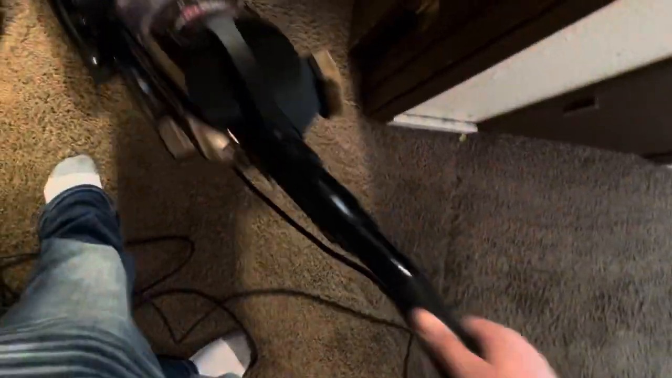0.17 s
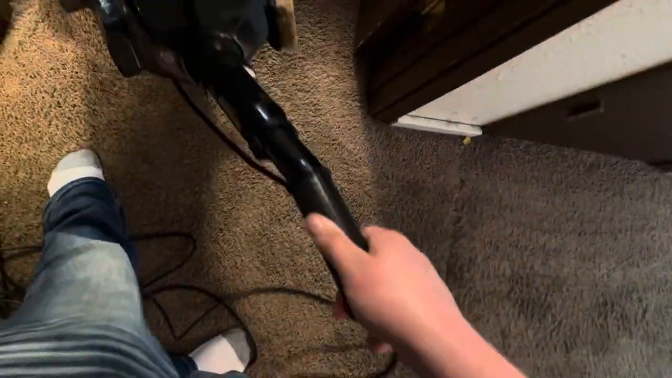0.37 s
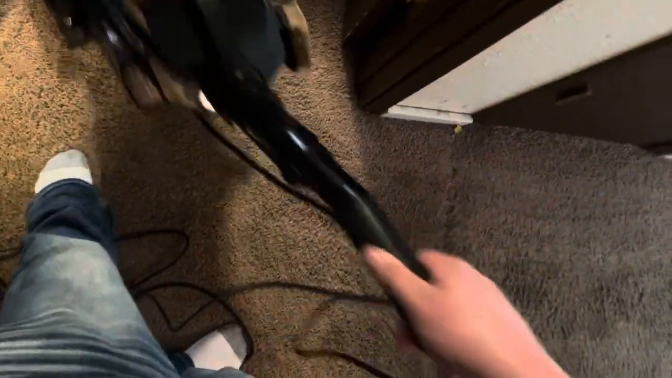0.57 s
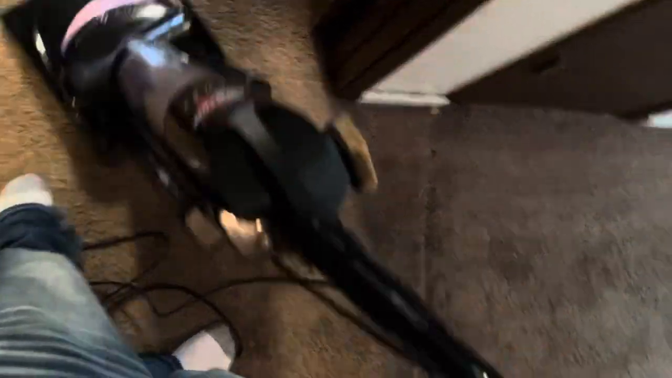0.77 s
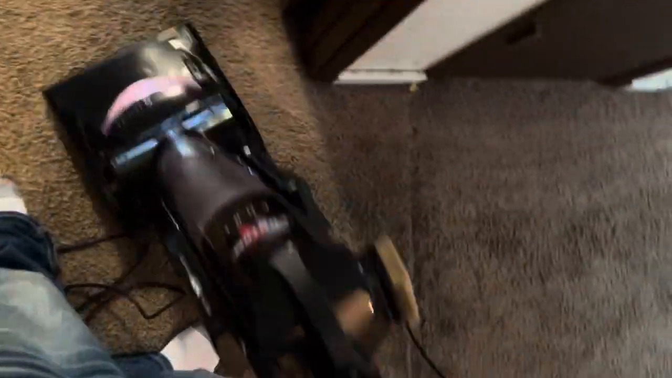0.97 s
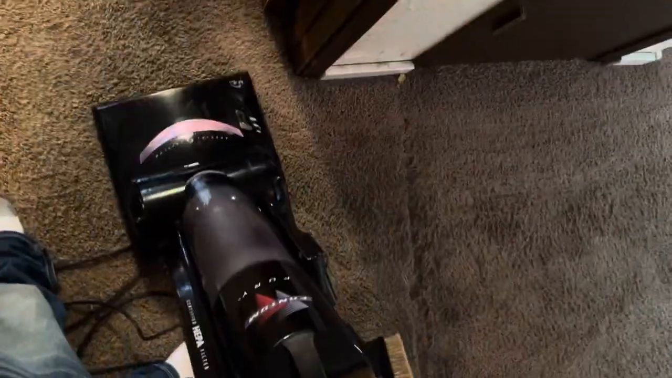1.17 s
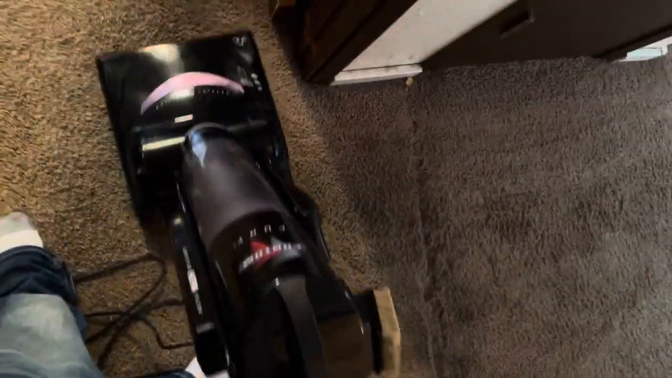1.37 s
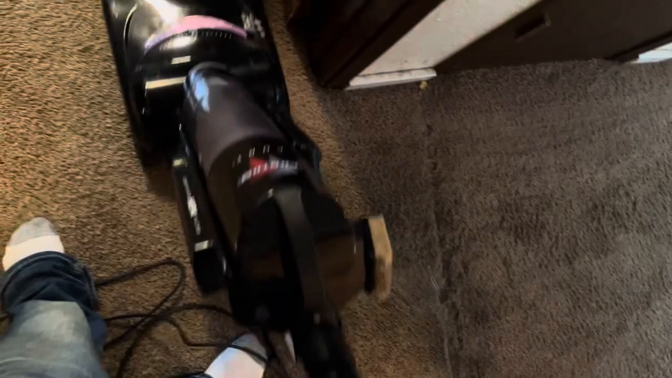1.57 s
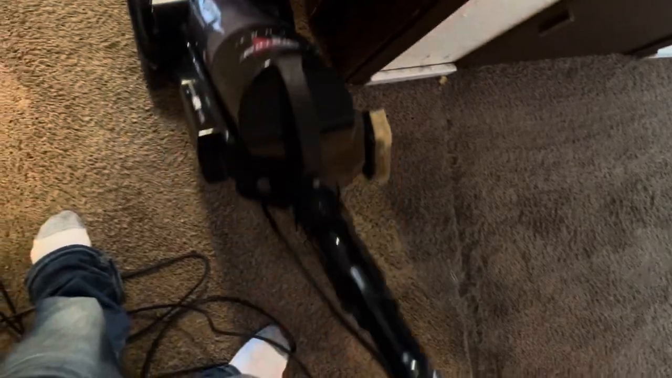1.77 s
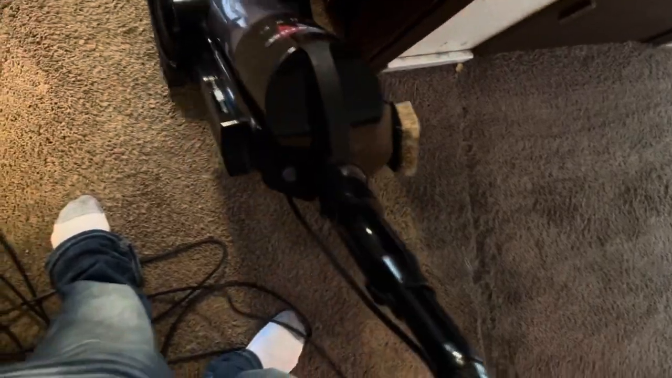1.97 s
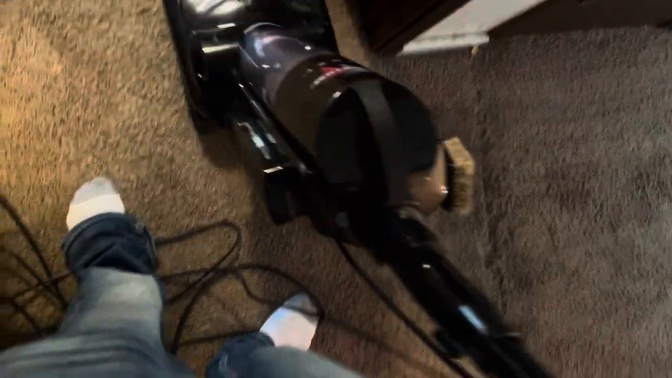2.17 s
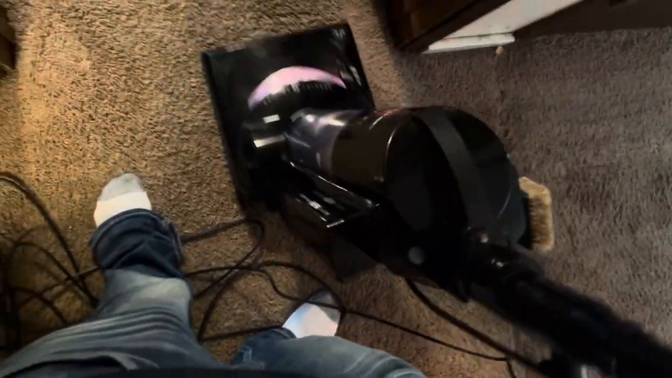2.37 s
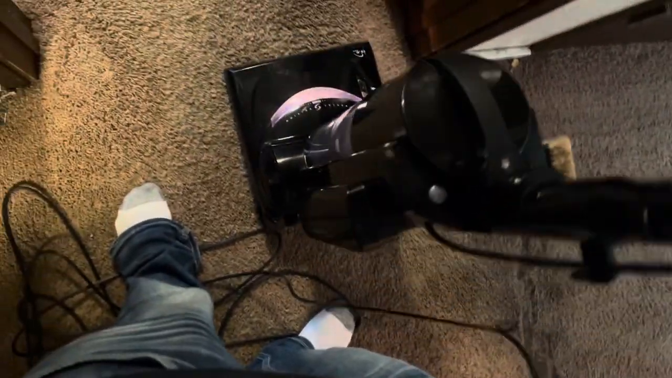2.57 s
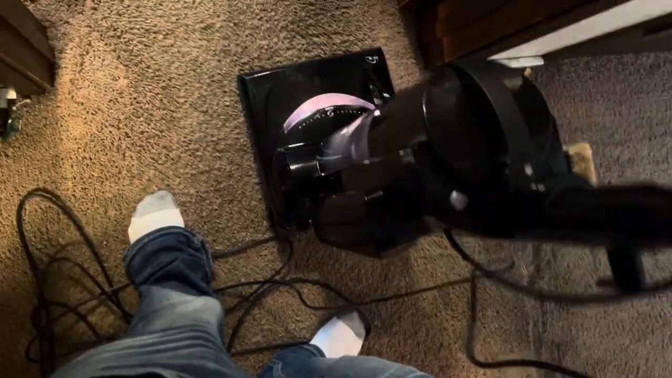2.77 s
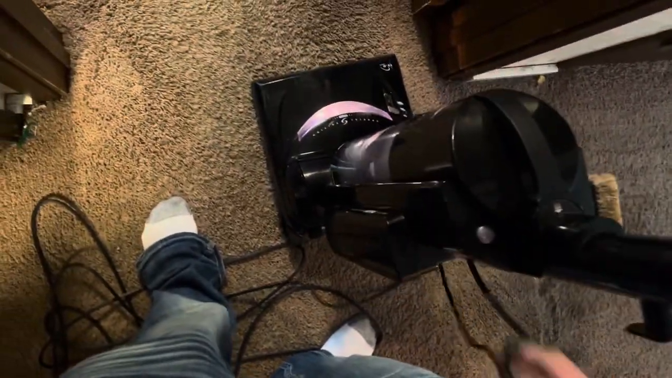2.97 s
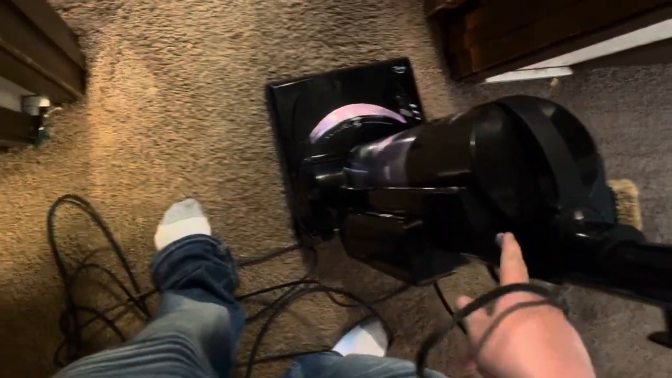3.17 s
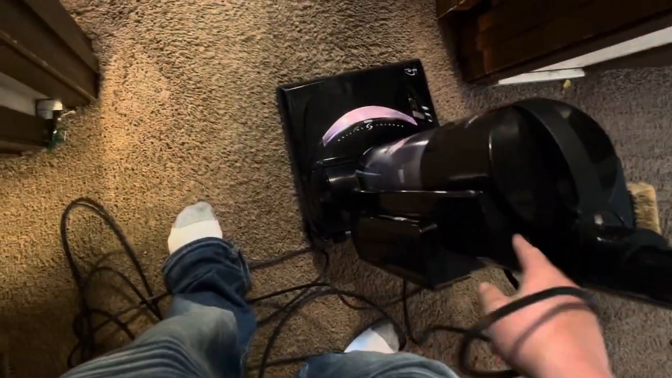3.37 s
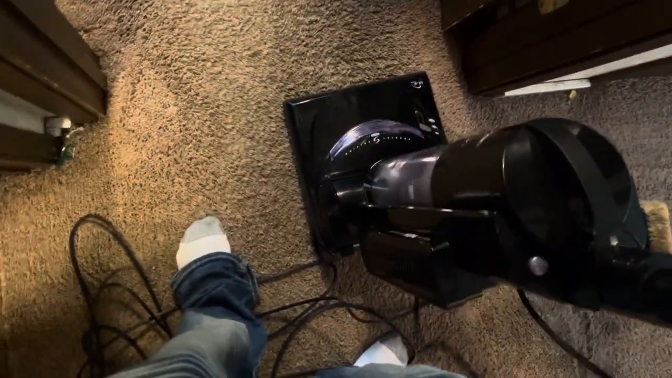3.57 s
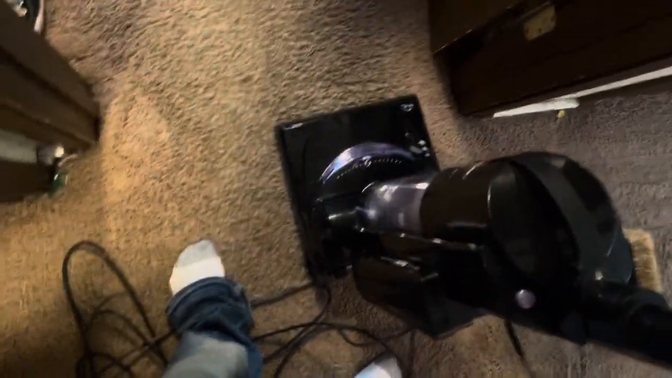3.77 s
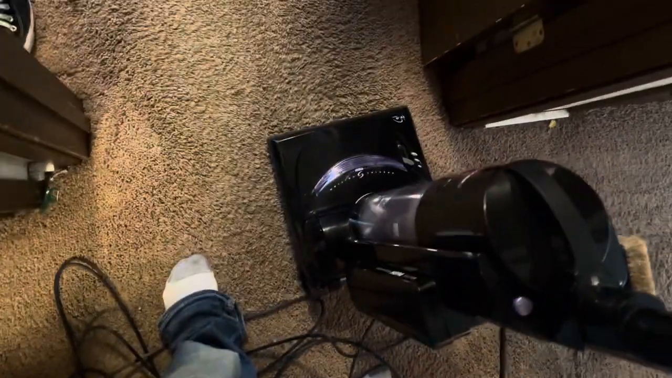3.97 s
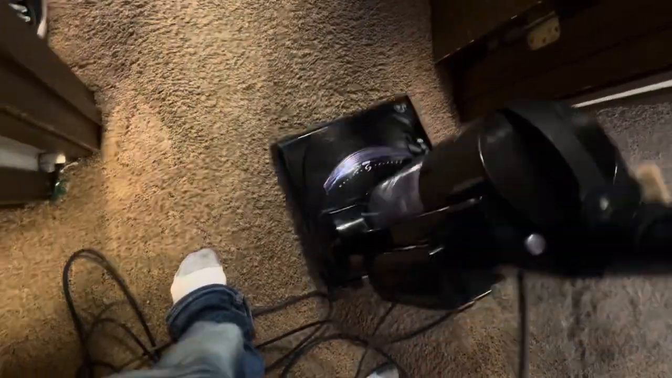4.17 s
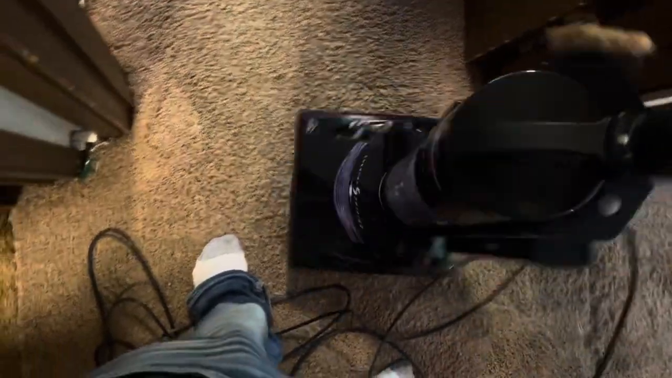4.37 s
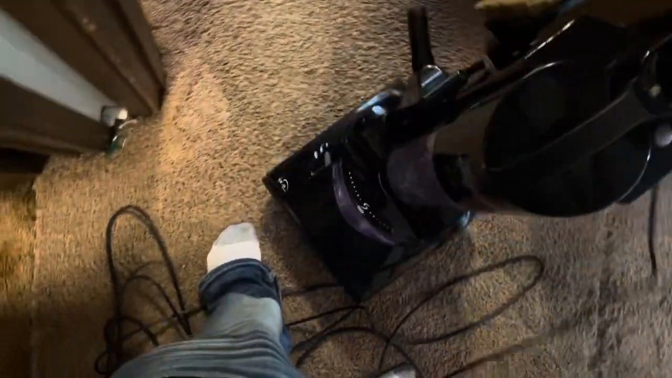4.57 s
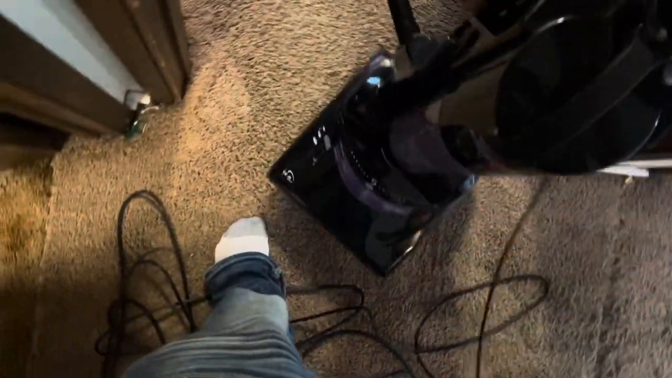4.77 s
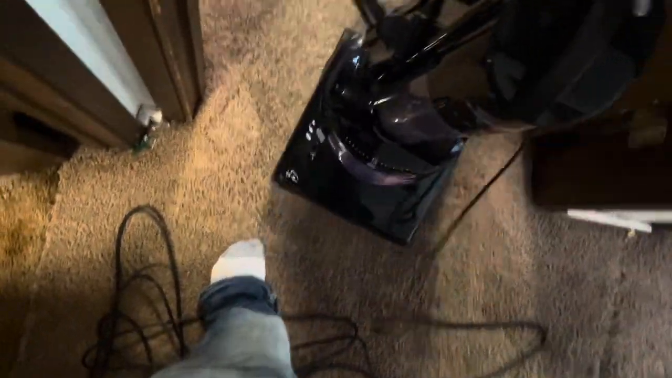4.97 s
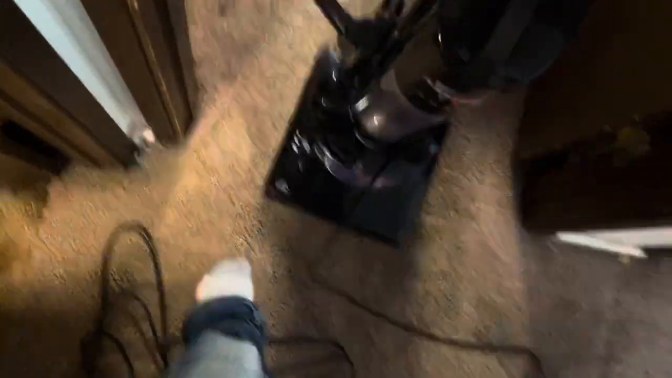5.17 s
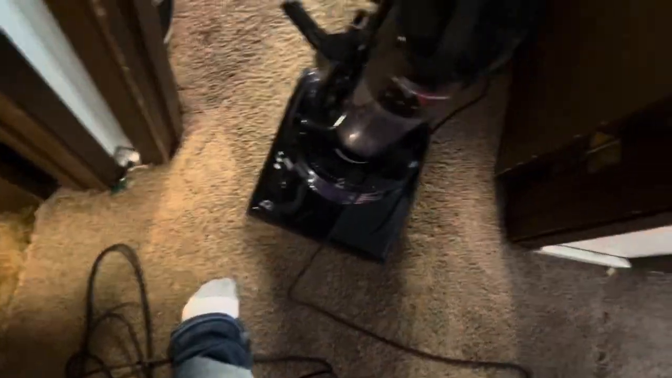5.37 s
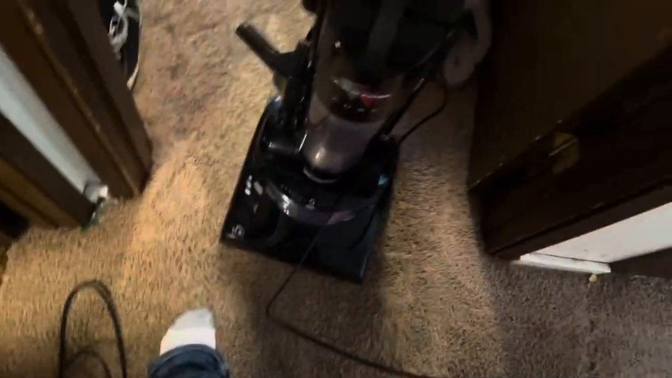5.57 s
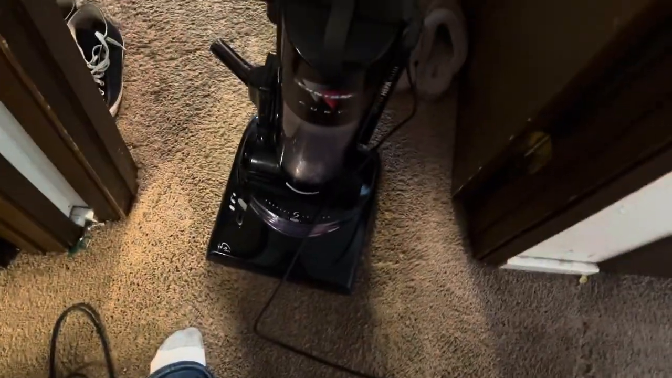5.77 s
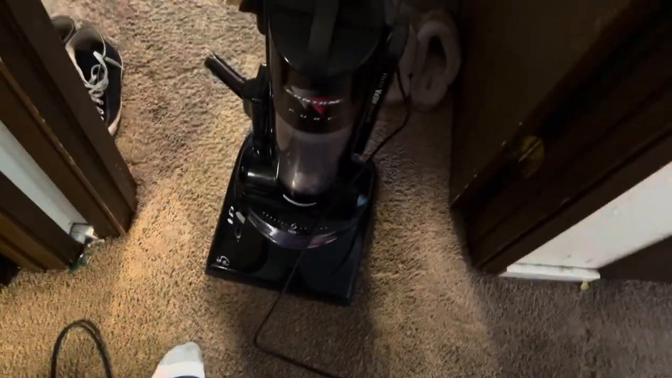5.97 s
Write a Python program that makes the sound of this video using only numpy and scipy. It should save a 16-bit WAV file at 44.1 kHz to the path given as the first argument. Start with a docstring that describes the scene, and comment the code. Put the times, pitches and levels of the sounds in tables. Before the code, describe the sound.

Close indoor vacuum cleaner roar with steady motor whine and brush hum, a latch clunk, switch click, falling coast-down and a rattling plastic thump.

```python
"""Vacuum cleaner on carpet, switched off and set aside

An upright vacuum cleaner is pushed over carpet in a small room, latched upright and switched off.
Whine and brush hum are sums of rotation-locked sines; the rushing air is noise shaped by duct resonances.
Tied by a belt, motor and brush roll coast down together. The machine is tipped back, wheeled aside
and set down; its plastic body clunks, snaps and rattles as decaying modes and noise bursts.
"""
import sys
import numpy as np
from scipy import signal
from scipy.fft import rfft, irfft
from scipy.io import wavfile
from scipy.ndimage import uniform_filter1d

SR = 44100
rng = np.random.default_rng(int(sys.argv[2]) if len(sys.argv) > 2 else 0)


def to_wav(sig):
    """Store sig (one row per channel, or 1-D mono) as 16-bit WAV at the path in sys.argv[1].

    Samples outside -1..1 are clipped; the rate is SR.
    """
    pcm = np.clip(np.atleast_2d(sig), -1, 1) * 32767
    pcm = np.round(pcm).astype(np.int16)
    wavfile.write(sys.argv[1], SR, pcm.T)  # frames by channels


N = 265570
TIME = np.arange(N) / SR

SWITCH_OFF_S = 3.4
# handle raised upright
RAISE_MIDDLE_S, RAISE_TAKES_S = 2.34, .65
# tipped back on the wheels, brush clear of the carpet, then set down
TIP_S, SET_DOWN_S, TIP_TAKES_S = 4.18, 5.09, .14

# motor speed under power: time_s, turns_per_s
RUNNING = [(0, 457), (.6, 460.7), (1.2, 456), (2.4, 458.5), (3.05, 465), (3.38, 463)]
# push out over the carpet: time_s, reach (0 near - 1 far)
REACH = [(0, 0.43), (.4, 1), (.6, 1), (.8, 0.21), (1.45, 0.02), (1.8, 0.68), (2.2, 0.1)]
# low resonances the slowing tones glide through: centre_hz, width_hz, lift_db
HOUSING = [(248, 26, 10), (292, 30, 10)]


def gain_of(db):
    """Decibels to amplitude."""
    return 10 ** (np.asarray(db) / 20)


def evened(x):
    """Scales to rms 1."""
    return x / np.sqrt(np.mean(x ** 2) + 1e-20)


def read(points, hz):
    """Spectrum table interpolated on a log-frequency axis."""
    f, value = np.transpose(points)
    return np.interp(np.log(hz + 1), np.log(f + 1), value)


def follow(rows, t):
    """Each column of a curve table at the times t."""
    s, *columns = np.transpose(rows)
    return np.array([np.interp(t, s, c) for c in columns])


def ramp(t, middle_s, takes_s):
    """A movement from 0 to 1."""
    return np.clip(.5 + (t - middle_s) / takes_s, 0, 1)


def swell(t, middle_s, half_s):
    """A movement from 0 to 1 and back."""
    return np.exp(-((t - middle_s) / half_s) ** 2)


def wander(hz, size=4096):
    """Slow random curve of rms 1, with little above the given rate."""
    t = np.linspace(0, N / SR, size)
    lowpass = 1 + (np.fft.rfftfreq(size, t[1]) / hz) ** 2
    slow = irfft(rfft(rng.standard_normal(size)) / lowpass)
    return evened(np.interp(TIME, t, slow))


def coloured(x, spectrum):
    """Filters x by a spectrum table."""
    return irfft(rfft(x) * gain_of(read(spectrum, np.fft.rfftfreq(len(x), 1 / SR))), len(x))


def add(mix, s, sound):
    """Mixes a sound in at time s."""
    part = mix[round(s * SR):][:len(sound)]
    part += sound[:len(part)]


def lift_db(resonances, hz):
    """Summed lift that a set of resonances gives at hz."""
    return sum(lift / (1 + (2 * (hz - f) / width) ** 2) for f, width, lift in resonances)


def stereo_spread(hz):
    """Complex gain of the left and right channel at each frequency: the stereo spread."""
    # centre_hz, left_lead_rad
    spread_phase = [(50, 0), (520, .1), (860, 1.4), (1300, .15), (1800, .15), (3000, 1.2), (4000, .4),
                    (5150, .5), (5700, -1.3), (6500, -1.2), (7600, -2.9), (9400, -3.2), (10500, -4.3),
                    (12000, -5.6), (12500, -6.2)]
    # centre_hz, left_minus_right_db
    spread_balance = [(60, 2.5), (120, 3), (200, 1.2), (290, .3), (360, -2.3), (460, 0), (700, 2.7),
                      (1300, 6.8), (2400, 4), (4400, 3.3), (8100, .3), (15000, 0)]
    half = gain_of(read(spread_balance, hz) / 2) * np.exp(.5j * read(spread_phase, hz))
    return np.array([half, 1 / half])


def tipped(t):
    """1 while the machine leans back on its wheels."""
    return ramp(t, TIP_S, TIP_TAKES_S) - ramp(t, SET_DOWN_S, TIP_TAKES_S)


def motor_hz(t):
    """Nearly steady under power; then fan (speed squared), bearings and carpet brake the motor."""
    fan_share_per_turn, bearing_hz_per_s, carpet_hz_per_s = .0013, 13.5, 20.5
    # set down again, the brush bites: lasting drag, and an extra at the landing
    landed_hz_per_s, landing_hz_per_s, landing_half_s = 29.5, 17.5, .08
    step_s = .005
    speed, hz = list(RUNNING), RUNNING[-1][1]
    times = np.arange(SWITCH_OFF_S, N / SR, step_s)
    brush_drag = carpet_hz_per_s * (1 - ramp(times, TIP_S, TIP_TAKES_S))
    brush_drag += landed_hz_per_s * ramp(times, SET_DOWN_S, TIP_TAKES_S)
    brush_drag += landing_hz_per_s * swell(times, SET_DOWN_S, landing_half_s)
    for s, drag in zip(times, brush_drag):
        speed.append((s, hz))
        hz = hz - step_s * (fan_share_per_turn * hz ** 2 + bearing_hz_per_s + drag)
    return follow(speed, t)[0]


def halvings(t):
    """How many times the motor's speed has halved."""
    return np.log2(RUNNING[-1][1] / motor_hz(t))


def coasting_db(step_db, per_halving_db, step_s):
    """A tone's level steps as the power goes; it also follows the speed."""
    return step_db * np.clip((TIME - SWITCH_OFF_S) / step_s, 0, 1) + per_halving_db * halvings(TIME)


def partial(turns, hz, db, scatter, scatter_hz, place=1):
    """One line: a steady direct part plus reflections that shift as the machine moves."""
    reflections = scatter * (wander(scatter_hz) + 1j * wander(scatter_hz))
    path = (1 + reflections) / np.sqrt(1 + 2 * scatter ** 2)
    tone = np.sqrt(2) * gain_of(db) * path * np.exp(2j * np.pi * (turns + rng.random()))
    return (place * stereo_spread(hz) * tone).real


def overtones(turns, hz, orders, scatter, scatter_hz):
    """Multiples of a rotation; levels follow motor speed and swell in the shaken housing panels."""
    # motor speeds at which the overtone levels are given: turns_per_s
    stages_hz = [460, 350, 265, 232, 160]
    # housing panels: centre_hz, width_hz, lift_db
    panels = [(690, 130, 9), (1370, 140, 7), (3650, 250, 3), (5050, 700, 9)]
    slowed, out = halvings(TIME), 0
    stage_halvings = np.log2(stages_hz[0] / np.array(stages_hz))
    for k, *stages_db in orders:
        db = np.interp(slowed, stage_halvings, stages_db) + lift_db(panels, k * hz)
        out = out + partial(k * turns, k * hz, db, scatter, scatter_hz)
    return out


def motor(mains_hz=120, mains_db=-47, far_db=-8.5):
    """Unbalanced fan sounds once a turn; blades and commutator add high lines; powered windings hum."""
    # tone before coasting, housing and vent: time_s, level_db
    whine_level = [(0.0, -24.5), (0.18, -20.5), (0.52, -22), (0.86, -20), (1.18, -26), (1.42, -20),
                   (1.89, -26), (1.92, -31.5), (2.17, -22), (2.65, -23.5), (2.79, -31.5), (2.81, -24.5),
                   (3.42, -23.5)]
    # where the whine is heard as the body turns: time_s, left_minus_right_db, left_lead_rad
    whine_place = [(0, 1.7, 0.21), (.6, .6, 0.24), (1.3, -.7, 0.33), (1.7, 2.2, .19), (2, 2.4, 0.24),
                   (2.3, -1, -0.25), (2.75, -3.5, -0.23), (3, -5, -0.71), (3.35, -6, -0.97),
                   (3.6, 6, -0.036)]
    # overtones before panel lift; commutator near 22: multiple, level_db at each of the five stages
    motor_orders = [(2, -57, -58, -42, -49, -51), (3, -43, -55, -61, -51, -59),
                    (4, -60, -54, -57, -62, -68), (5, -65, -60, -55, -59, -68),
                    (6, -68, -65, -61, -56, -67), (7, -70, -68, -67, -64, -67),
                    (8, -51, -64, -63, -69, -71), (9, -67, -67, -72, -72, -68),
                    (11, -62.5, -56, -68, -71, -73), (13, -66, -64, -61, -70, -76),
                    (16, -72, -69, -75, -73, -78), (20, -85, -85, -80, -80, -74),
                    (21, -85, -85, -77, -69.5, -73), (22, -58, -61, -72, -79, -70),
                    (23, -70, -75, -80, -67, -72), (25, -78, -74, -75, -80, -76),
                    (27, -67, -80, -80, -81, -74), (28, -80, -78, -76, -82, -81),
                    (29, -78, -74, -80, -83, -82), (33, -77, -78, -90, -82, -92),
                    (35, -85, -78, -88, -96, -80.5)]
    hz = motor_hz(TIME) * (1 + .0004 * wander(6))
    turns = np.cumsum(hz) / SR
    db = follow(whine_level, TIME)[0] + lift_db(HOUSING, hz)
    db += coasting_db(step_db=-11, per_halving_db=-9, step_s=.4)
    db += 6 * swell(TIME, middle_s=4.24, half_s=.055)  # vent swings past
    pan_db, lead_rad = follow(whine_place, TIME)
    left = gain_of(pan_db / 2) * np.exp(.5j * lead_rad)
    whine = partial(turns, hz, db, scatter=.16, scatter_hz=8.6, place=np.array([left, 1 / left]))
    powered = np.clip((SWITCH_OFF_S - TIME) / .05, 0, 1)
    windings = partial(mains_hz * TIME, np.full(N, mains_hz), mains_db, scatter=.4, scatter_hz=6)
    reach_gain = gain_of(far_db * follow(REACH, TIME)[0])  # overtones fade as it is pushed out
    lines = overtones(turns, hz, motor_orders, scatter=.22, scatter_hz=3)
    return whine + powered * windings + reach_gain * lines


def brush(belt_ratio=.44, beat_level_db=-43, lifted_db=-8.5):
    """Belt-driven bristle rows beat the carpet; the pile drags them, and lets go when tipped."""
    # belt slip with the brush on the carpet: time_s, share_of_speed_lost
    belt_slip = [(0, .09), (.45, .08), (1.45, .1), (2.3, .103), (3.3, .122), (3.8, .092), (4.2, .08),
                 (5.1, .05)]
    # brush digs into the pile: middle_s, half_length_s, extra_slip_share, beat_lift_db
    digs = [(1.11, .16, .033, 11), (1.92, .07, .018, 5), (2.34, .11, .003, 8), (2.61, .13, .04, 7)]
    # octave of the beat before coasting and resonances: time_s, level_db
    octave_level = [(0.0, -29), (0.04, -25.5), (0.83, -30), (0.96, -24), (1.14, -29), (1.16, -41),
                    (1.31, -27.5), (1.47, -34), (1.67, -28.5), (2.64, -25.5), (3.33, -35.5), (3.42, -30)]
    # floor resonance: centre_hz, width_hz, lift_db
    floor = [(148.7, 22, 9.8)]
    # overtones before panel lift: multiple, level_db at each of the five stages
    brush_orders = [(.5, -51, -60, -65, -70, -70), (3, -48, -35, -40, -41, -47),
                    (4, -55, -47, -40, -43, -41), (5, -66, -60, -48, -45, -46),
                    (6, -58, -49, -59, -59, -45), (7, -55, -55, -57, -59, -53)]
    on_carpet = 1 - tipped(TIME)
    dig_slip, dig_db = sum(np.outer([slip, db], swell(TIME, s, half)) for s, half, slip, db in digs)
    slip = on_carpet * (follow(belt_slip, TIME)[0] + dig_slip)
    hz = belt_ratio * motor_hz(TIME) * (1 - slip) * (1 + .003 * wander(8))  # bristle rows per s
    turns = np.cumsum(hz) / SR
    beat_db = beat_level_db + dig_db + on_carpet * lift_db(floor, hz)
    beat_db += coasting_db(step_db=9.5, per_halving_db=-21.5, step_s=.12)
    octave_db = follow(octave_level, TIME)[0] + lift_db(HOUSING + floor, 2 * hz)
    octave_db += coasting_db(step_db=-3, per_halving_db=-10, step_s=.16)
    octave_db += lifted_db * (1 - on_carpet)
    beat = partial(turns, hz, beat_db, scatter=.18, scatter_hz=2.5)
    octave = partial(2 * turns, 2 * hz, octave_db, scatter=.21, scatter_hz=10.5)
    return beat + octave + overtones(turns, hz, brush_orders, scatter=.35, scatter_hz=4)


def flow_db(t, hz):
    """The air noise follows the motor's speed and the way the machine is held."""
    # centre_hz, full_speed_db, per_halving_db, pushed_out_db, upright_db, tipped_db, swivel_db, set_down_db
    air_response = [ (108, 2, -7.5, -6.5, -4, -5, -4, 1.5), (312, -2.5, -4.5, 3, 4.5, 3, 1, -1.5),
                    (588, 0.5, -6.5, -8, -2.5, 3, -5, 4.5), (710, 6, -15, -6, -1.5, 3, 1.5, 4),
                    (1230, -.5, -17.5, -3.5, 5, 2.5, 5.5, 1), (2480, 1, -12, 1, 1.5, .5, 0, 0.5),
                    (5900, 4, -15, -2, -3.5, 1.5, -1, -0.5), (11600, -3, -11.5, 4.5, 6, 0.5, -5, -5),
                    (14800, -4, -10.5, -4.5, 3, 4.5, 0, 1)]
    swivel = swell(t, middle_s=4.13, half_s=.36)  # ducts pass the listener
    causes = [np.ones(len(t)), halvings(t), follow(REACH, t)[0], ramp(t, RAISE_MIDDLE_S, RAISE_TAKES_S),
              tipped(t), swivel, ramp(t, SET_DOWN_S, TIP_TAKES_S)]
    bands, *responses = np.transpose(air_response)
    return sum(np.outer(cause, read(np.transpose([bands, db]), hz))
               for cause, db in zip(causes, responses))


def air(patchy_db=1.12, standing_db=1.5, flicker_db=.5):
    """Turbulence coloured by the ducts and by standing waves that drift as the machine moves."""
    # base spectrum of the rushing air: centre_hz, level_db_per_hz
    air_spectrum = [(30, -87), (75, -97), (125, -59), (200, -58), (280, -57.5), (450, -54.5), (800, -59.5),
                    (1500, -61.5), (2400, -73.5), (3500, -76), (6500, -73), (8000, -80), (10300, -79),
                    (12400, -77), (13400, -86.5), (15500, -92)]
    # housing, ducts and dust cup: centre_hz, width_hz, lift_db
    ducts = [(155, 23, 11.5), (247, 40, 4), (283, 25, -0.5), (610, 23, 4.5), (774, 53, 2.5), (995, 46, 2.5),
             (1225, 43, 1), (2011, 30, 8.5), (3030, 460, 3), (3520, 680, 2.5), (4180, 310, -1),
             (5600, 260, -2.5), (6270, 2400, -3.5)]
    # exhaust duct singing in the air stream: centre_hz, width_hz, lift_db
    exhaust = [(1375, 70, 3.5), (3650, 130, 1.5), (5000, 200, 2), (5390, 200, 4), (5800, 450, -2.5),
               (7850, 600, 2.5), (8900, 1100, 3.5), (10200, 400, 3)]
    # wheels drumming on the floor as it is pulled back: centre_hz, width_hz, lift_db
    wheels = [(278, 58, 5.2), (141, 35, 2.1)]
    # vent facing the listener when upright, a nasal colour: centre_hz, width_hz, lift_db
    vent = [(800, 300, -2), (1310, 140, 4), (1600, 200, -2.5), (5350, 260, 2.5)]
    # likeness of the two channels: centre_hz, likeness (0-1)
    channel_likeness = [(60, .95), (150, .93), (400, .96), (700, .87), (1400, .82), (2800, .62),
                        (5000, .72), (7500, .9), (8800, .97), (10500, .92), (13000, .92)]
    frames, hz = N // 256 + 5, np.fft.rfftfreq(1024, 1 / SR)
    t = np.arange(frames) * 256 / SR
    a, b, c, d, patches, standing = rng.standard_normal((6, frames, len(hz)))
    patches = uniform_filter1d(uniform_filter1d(patches, size=8, axis=0), size=8, axis=1)
    standing = uniform_filter1d(uniform_filter1d(standing, size=110, axis=0), size=2, axis=1)
    field_db = read(air_spectrum, hz) + flow_db(t, hz) + lift_db(ducts + exhaust, hz)
    field_db += np.outer(swell(t, middle_s=1.79, half_s=.29), lift_db(wheels, hz))
    field_db += np.outer(ramp(t, RAISE_MIDDLE_S, RAISE_TAKES_S), lift_db(vent, hz))
    field_db += patchy_db * evened(patches) + standing_db * evened(standing)
    field_db += flicker_db * rng.standard_normal((frames, 1))
    same = np.clip(read(channel_likeness, hz), 0, 1)
    left = a + 1j * b
    right = same * left + np.sqrt(1 - same ** 2) * (c + 1j * d)
    z = np.array([left, right]) * stereo_spread(hz)[:, None] * gain_of(field_db)
    per_bin = np.sqrt(1.5 * hz[1])  # level per Hz to level per bin
    noise = signal.istft(z, nperseg=1024, noverlap=768, time_axis=1, freq_axis=2)[1]
    return per_bin * noise[:, :N]


def blows(crack_t60_s=.029, tick_t60_s=.036, contact_s=.0002):
    """Each blow rings the plastic body under a short crack and a bright tick."""
    # start_s, thud_db, crack_db, tick_db
    blow_rows = [(.057, -53, -43, -28), (2.573, -27, -22, -40), (2.578, -22, -19, -31),
                 (2.583, -19, -18, -31), (2.879, -50, -43, -24), (3.2185, -40, -28, -18),
                 (3.372, -32, -27, -19.5), (4.219, -29, -28, -54), (4.263, -23, -29, -52),
                 (4.289, -18, -22, -50), (5.053, -20, -42, -56), (5.067, -11.5, -16, -39),
                 (5.072, -17, -20, -46), (5.087, -17, -29, -43), (5.091, -19, -25, -48),
                 (5.096, -22, -23.5, -45), (5.103, -27, -25, -43), (5.13, -16, -16, -47),
                 (5.143, -35, -38, -41), (5.157, -35, -34, -41), (5.171, -25, -25, -42),
                 (5.191, -29, -40, -34), (5.209, -23, -30, -50), (5.219, -33, -37, -50)]
    # body modes before random detuning: pitch_hz, relative_db, t60_s
    body_modes = [(158, 0.5, 0.042), (228.8, -3.5, 0.7), (287, 9, 0.16), (335, 10, 0.092),
                  (410, 8.5, 0.053), (569, 6, 0.063), (752, 3, 0.033), (1280, -4, 0.065), (1950, -4, 0.026),
                  (2680, -19, 0.047)]
    # centre_hz, relative_db
    crack_spectrum = [(50, -5), (220, 25.5), (700, 14), (1500, 11), (2800, -1.5), (4200, -4), (7000, -7.5),
                      (12000, -27)]
    # centre_hz, relative_db
    tick_spectrum = [(500, -12), (6000, -5.5), (9000, -1), (11000, 8.5), (13000, -27), (16000, -29)]
    t, out = np.arange(SR // 4) / SR, np.zeros(N)
    for s, thud_db, crack_db, tick_db in blow_rows:
        thud = np.zeros(len(t))
        for k, (hz, db, t60_s) in enumerate(body_modes):
            mode = np.sin(2 * np.pi * hz * rng.uniform(.94, 1.03) * t)
            thud += gain_of(db - 60 * t / t60_s) * mode * (-1) ** k
        crack = evened(coloured(rng.standard_normal(len(t)), crack_spectrum))
        crack *= gain_of(crack_db - 60 * t / crack_t60_s)
        tick = evened(coloured(rng.standard_normal(len(t)), tick_spectrum))
        tick *= gain_of(tick_db - 60 * t / tick_t60_s)
        onset = 1 - np.exp(-t / contact_s)
        add(out, s, gain_of(thud_db) * thud / abs(thud).max() + (crack + tick) * onset)
    return out


def rattles(clicks_per_s=450, click_s=.0012):
    """Dust cup, wand and clips chatter in their seats: a dense, dying shower of tiny uneven clicks."""
    # chatter after a jolt: start_s, start_level_db, t60_s
    rattle_rows = [(2.574, -25, .09), (4.275, -35, .2), (5.067, -27, .08), (5.088, -31, .11),
                   (5.132, -37, .2)]
    # centre_hz, relative_db
    rattle_spectrum = [(150, -20), (500, 10), (1300, 3), (2400, -3), (4000, -12), (7000, -15), (11000, -25),
                       (15000, -32)]
    t, out = np.arange(SR // 2) / SR, np.zeros(N)
    for s, db, t60_s in rattle_rows:
        clicks = (rng.random(len(t)) < clicks_per_s / SR) * rng.uniform(.3, 1, len(t))
        envelope = signal.lfilter([1], [1, -np.exp(-1 / (click_s * SR))], clicks)
        puffs = envelope * rng.standard_normal(len(t))
        add(out, s, evened(coloured(puffs, rattle_spectrum)) * gain_of(db - 60 * t / t60_s))
    return out


def snaps(t60_s=.014, width_share=.58):
    """Small plastic catches spring into place, each ringing briefly around its own pitch."""
    # handle latch and switch: start_s, pitch_hz, level_db
    snap_rows = [(2.577, 2300, -23), (2.579, 4100, -21.5), (2.88, 11500, -28), (3.2185, 4600, -26),
                 (3.222, 11100, -25), (3.373, 4200, -29), (3.374, 12500, -24.5)]
    t, out = np.arange(SR // 8) / SR, np.zeros(N)
    f = np.fft.rfftfreq(len(t), 1 / SR)
    for s, hz, db in snap_rows:
        resonance = 1 / (1 + (2 * (f - hz) / (width_share * hz)) ** 2)
        ring = irfft(rfft(rng.standard_normal(len(t))) * resonance, len(t))
        add(out, s, evened(ring) * gain_of(db - 60 * t / t60_s))
    return out


def bumps(rise_s=.0025):
    """The wheels thump the floor through the carpet: soft-edged decaying sines."""
    # start_s, pitch_hz, level_db, t60_s
    bump_rows = [(0.289, 151.4, -24, 0.44), (1.942, 152, -25, 0.52), (5.095, 48, -31, .2),
                 (5.107, 151.3, -20, 0.34)]
    t, out = np.arange(SR // 2) / SR, np.zeros(N)
    for s, hz, db, t60_s in bump_rows:
        envelope = gain_of(db - 60 * t / t60_s) * (1 - np.exp(-t / rise_s))
        add(out, s, envelope * np.sin(2 * np.pi * hz * t))
    return out


def room(x):
    """A short carpeted tail of decaying noise, different in each channel; t60 varies with frequency."""
    # centre_hz, t60_s
    room_decay = [(100, 0.045), (500, 0.072), (3000, 0.57), (14000, 0.052)]
    hz, t, z = signal.stft(rng.standard_normal((2, SR // 2)), SR, nperseg=256)
    decay = gain_of(-60 * t / read(room_decay, hz)[:, None]) * (t > .004)
    tail = signal.istft(z * decay, SR, nperseg=256)[1]
    return signal.fftconvolve(x[None], tail / np.linalg.norm(tail[0]), axes=1)[:, :N]


def room_hum(hz=60.5, db=-48):
    """A low wavering drone in the house: one sine with strong random scatter."""
    return partial(hz * TIME, hz * np.ones(N), db, scatter=1.1, scatter_hz=9)


def scene():
    """The running machine, its knocks and the room."""
    knocks = blows() + rattles() + snaps() + bumps()
    direct = irfft(rfft(knocks) * stereo_spread(np.fft.rfftfreq(N, 1 / SR)), N)
    return motor() + brush() + air() + room_hum() + direct + gain_of(-9) * room(knocks)


def record(dry):
    """The recorder sheds the deepest bass and stops at its band limit."""
    lean = signal.sosfilt(signal.butter(3, 42, "high", fs=SR, output="sos"), dry)
    band_limit = signal.firwin(511, 15700, window=("kaiser", 9), fs=SR)
    return signal.oaconvolve(lean, band_limit[None], "same")


dry = scene()
out = record(dry)
to_wav(out)
```